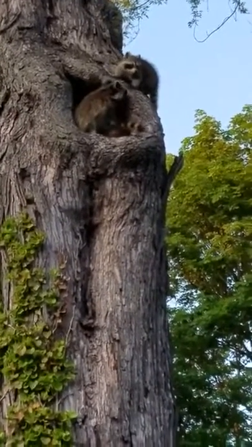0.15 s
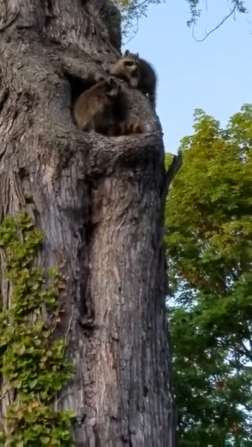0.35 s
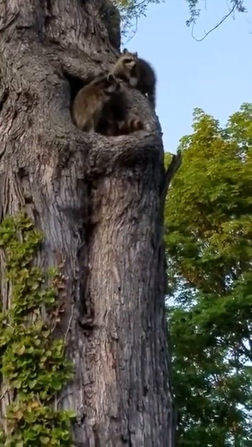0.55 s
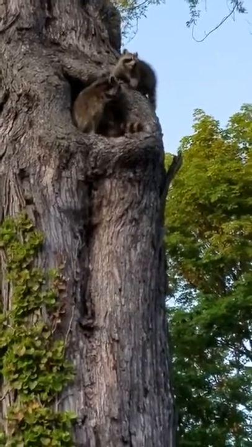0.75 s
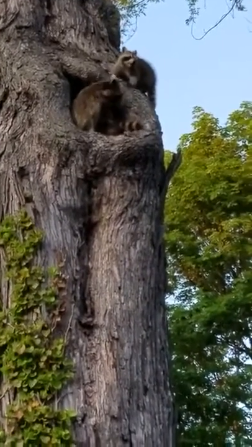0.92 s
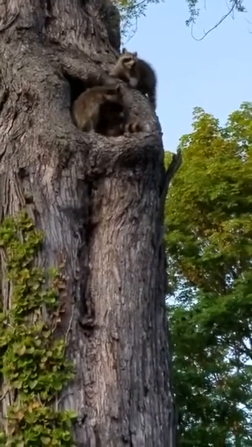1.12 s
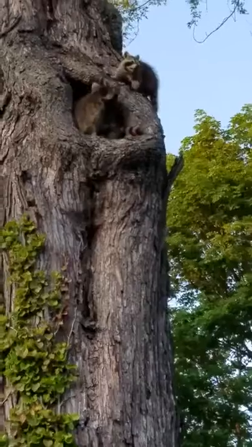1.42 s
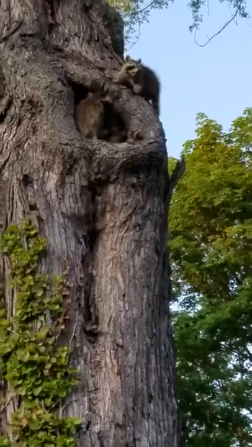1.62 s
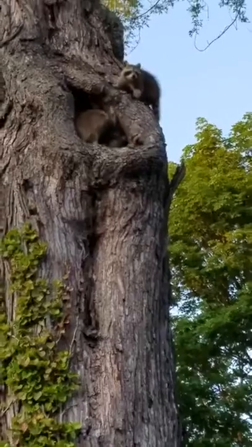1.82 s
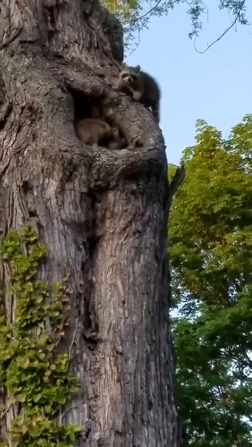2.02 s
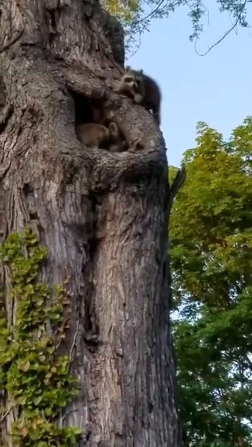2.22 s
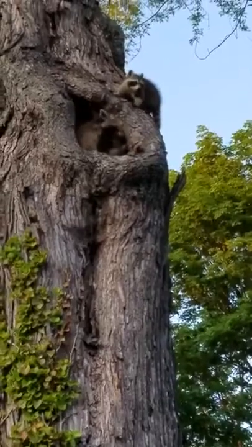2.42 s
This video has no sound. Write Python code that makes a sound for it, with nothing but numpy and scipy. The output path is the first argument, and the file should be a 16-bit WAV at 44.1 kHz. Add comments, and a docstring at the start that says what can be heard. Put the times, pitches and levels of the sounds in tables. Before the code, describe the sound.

Raspy raccoon chatter, rapid pulsing squeaks from two animals, then fading echo and faint outdoor rumble

```python
"""Two raccoons quarrel at a hollow in a tree, a few metres above the microphone.
One chitters in high, arched squeaks, about 21 a second; a lower, hoarser voice joins: both are summed partials.
A rasp of filtered noise surges with their squeaks, and moving resonances shape the mouths.
Delayed copies and decaying noise echo them from a wall and nearby surfaces.
Behind lie a faint noise rumble, a sine hum, swelling hiss, a few soft thumps and light ticks."""
import sys
import numpy as np
from scipy import signal
from scipy.fft import rfft, irfft
from scipy.io import wavfile

SR = 44100
rng = np.random.default_rng(int(sys.argv[2]) if len(sys.argv) > 2 else 0)


def put_to_file(sound):
    """Save the sound as 16-bit audio at rate SR, in the file named by the first command-line argument."""
    columns = np.atleast_2d(sound).T  # one column per channel
    safe = np.clip(columns, -1, 1)
    whole_steps = np.round(safe * 32767)
    wavfile.write(sys.argv[1], SR, whole_steps.astype(np.int16))


N = 112454

# Spectrum of the distant outdoor rumble: (frequency [Hz], relative level [dB])
OUTDOORS_SPECTRUM = [(25, -23), (40, -22), (59, -21), (107, -6), (130, -3), (200, -1.5), (280, -5),
                     (445, -11.5), (920, -10.5), (1500, -16.5), (2200, -24.5), (3800, -23), (6200, -39.5),
                     (15500, -47)]
# Stereo width of the rumble: (frequency [Hz], side against mid [dB])
OUTDOORS_WIDTH = [(60, -25), (125, -22.5), (250, -12.5), (500, -10), (1000, -5), (4000, -0.5)]
# Faint, distant hisses: (peak time [s], time from peak to an 11 dB fall [s], centre [Hz],
# level before colouring [dB])
DISTANT_HISSES = [(.11, .07, 3600, -57), (2.02, 0.12, 3600, -55.5), (2.32, .09, 3970, -57)]
# Dulling of the distant hiss: (frequency [Hz], gain [dB])
HISS_COLOUR = [(1500, -11), (4700, -1), (7000, -8)]
# Soft thumps: (time [s], length before the release [s], centre [Hz], peak level of the boom [dB])
SOFT_THUMPS = [(0.153, .052, 131.6, -39.5), (1.213, 0.043, 132, -43.5), (1.503, 0.016, 190, -45.5),
               (1.539, 0.038, 148.5, -50.5), (1.753, 0.056, 150, -47), (2.22, .014, 208, -47.5),
               (2.402, 0.028, 190, -51)]
# Light ticks, perhaps claws on bark: (time [s], centre [Hz], level before decay and colouring [dB])
LIGHT_TICKS = [(1.76, 350, -43), (1.774, 496, -39), (1.795, 434, -41), (1.796, 1700, -42.5),
               (2.02, 1670, -53)]
# Colour of the late echoes, body and treble: (frequency [Hz], gain [dB])
TAIL_COLOUR = [(1200, 5), (1650, -5), (2500, 4.0), (3100, -3.0), (6000, -8.0)]
TAIL_TREBLE_COLOUR = [(2000, -13.0), (4500, 1), (14000, -11.5)]
# Colour of the left microphone against the right: (frequency [Hz], gain [dB])
LEFT_MIC_COLOUR = [(1000, -2), (1600, -7.5), (2000, -6.5), (2800, 0), (4000, 0.5), (6000, -2.5), (9000, -4),
                   (14000, -1.5)]
# Forced air in both throats: (time [s], middle before trim [dB], treble before trim [dB])
RASP_LEVELS = [(0.17, -58, -62), (0.208, -54, -40.5), (0.228, -51, -51.5), (0.246, -47.5, -38.5),
               (0.469, -45.5, -40), (0.698, -32.5, -31), (0.914, -39.5, -28.5), (0.965, -30.5, -27),
               (1.014, -38.5, -33), (1.04, -32.5, -25), (1.24, -33, -29.5), (1.268, -28.5, -29),
               (1.386, -30.5, -24.5), (1.43, -32, -32)]
# Throat colour of the rasp, middle and treble: (frequency [Hz], relative level [dB])
RASP_MIDDLE_COLOUR = [(500, -54), (1100, -25.5), (1400, -0.5), (1650, -3), (2150, -1), (2550, 2),
                      (2800, -4), (3150, 2), (3550, -5.5), (3950, -7.5), (4450, -11.5), (5200, -35)]
RASP_TREBLE_COLOUR = [(3800, -35), (4500, -9), (4900, 3), (5400, 3), (5850, 1), (6700, 3), (7500, 0),
                      (8300, -3), (8900, -5.5), (11000, -3.5), (12300, -13.5), (13800, -11.5), (15500, -15)]
# Narrow fixed resonances in the rasp: (frequency [Hz], width [Hz], level [dB])
RASP_RESONANCES = [(5780, 260, -3), (6720, 240, -4)]
# Moving upper resonance of the mouths: (time [s], frequency [Hz])
MOUTH_PATH = [(.2, 3400), (.45, 3330), (.6, 3700), (.8, 3860), (1.0, 4200), (1.24, 4010), (1.32, 4310),
              (1.41, 4300)]
# Squeaks of each voice: (start [s], length before the release [s], pitch before the arch [Hz],
# fundamental before colouring [dB], octave before colouring [dB])
LOW_SQUEAKS = [(0.474, 0.04, 1580, -30, -34), (0.564, 0.034, 1558, -30, -36),
               (0.608, 0.024, 1575, -27, -30), (0.655, 0.035, 1624, -25.5, -26),
               (0.708, 0.024, 1598, -25.5, -29), (0.747, 0.043, 1580, -25, -30),
               (0.79, 0.049, 1587, -27, -23), (0.845, 0.038, 1616, -21, -20.5),
               (0.891, 0.033, 1640, -27.5, -21), (0.946, 0.039, 1622, -31, -34),
               (0.985, 0.033, 1608, -28, -27.5), (1.024, 0.048, 1650, -28, -23),
               (1.079, 0.0278, 1592, -30, -28.5), (1.126, 0.05, 1607, -27.5, -25.5),
               (1.16, 0.035, 1574, -27, -27), (1.208, 0.032, 1553, -29, -29.5),
               (1.266, 0.04, 1558, -27.5, -36), (1.349, 0.054, 1611, -24.5, -27)]
HIGH_SQUEAKS = [(0.189, 0.028, 1407, -34.5, -47.5), (0.235, 0.026, 1656, -22, -26),
                (0.282, 0.031, 1757, -23.5, -26), (0.338, 0.027, 1778, -23.5, -26),
                (0.389, 0.034, 1745, -26, -25.5), (0.438, 0.031, 1750, -28, -25),
                (0.482, 0.037, 1784, -25, -25.5), (0.531, 0.033, 1831, -25.5, -22.5),
                (0.573, 0.034, 1854, -30.5, -22), (0.618, 0.042, 1890, -30, -23.5),
                (0.669, 0.034, 1927, -28, -21), (0.713, 0.031, 1920, -28.5, -20),
                (0.761, 0.028, 1930, -32, -19), (0.808, 0.045, 1950, -28.5, -23),
                (0.869, 0.03, 1988, -24, -19.5), (0.914, 0.0328, 1995, -20.5, -20.5),
                (0.956, 0.032, 1996, -22.5, -22), (0.998, 0.028, 1980, -21, -17.5),
                (1.052, 0.032, 1963, -28, -28), (1.09, 0.03, 1960, -28, -21.5),
                (1.212, 0.031, 1942, -42, -23), (1.288, 0.038, 2068, -36, -24.5),
                (1.384, 0.022, 2097, -38, -31)]
# Partials from the third up: (level relative to the octave [dB])
LOW_UPPER_PARTIALS = [-14.5, -3, -13.5]
HIGH_UPPER_PARTIALS = [-13.5, -11]
# Depth of the pitch arch; the high one flattens: (time [s], relative fall per squared share of length)
LOW_PITCH_ARCH = [(0, .19)]
HIGH_PITCH_ARCH = [(.35, 0.219), (.75, 0.1104)]
# Throat resonances of each voice: (frequency [Hz], gain [dB])
LOW_THROAT_COLOUR = [(1100, -4), (1450, 0), (1610, 6.5), (1750, 6.5), (2600, 13), (2900, 7.5), (3070, 9),
                     (3250, -2.5), (4300, -7), (4900, 9.5), (6500, -1), (9000, 8.5)]
HIGH_THROAT_COLOUR = [(1100, -3.5), (1600, 5), (1800, -1), (2000, 1.5), (2500, 6.5), (3100, 1), (3300, -2),
                      (3520, 1.5), (3700, 0), (3950, -0.5), (4200, -5), (4500, -20), (5000, 0.5),
                      (5400, 1.5), (5850, 3), (6600, 1), (7300, 2.5), (7700, -19), (8000, -2), (8700, 4.5)]
# Hiss that rides on each squeak: (frequency [Hz], relative level [dB])
FIZZ_COLOUR = [(1500, -10), (2300, 21.5), (2800, -19), (3080, 7), (3700, -6), (4200, -17), (4800, 5),
               (7000, -3), (8000, -2), (11000, 5), (12000, -1), (14000, 5.5)]

# Background; the rumble and hum levels precede their drift and the left/right balance
OUTDOORS_DB, HUM_DB, HUM_HZ = -47.89, -61, 71.4
THUMP_SAG_PER_S, SCUFF_DB = 5, -6.5  # relative fall in pitch; scuffing noise against the boom

# Echoes around the tree
DIRECT_LEFT_DB, DIRECT_RIGHT_DB = -7, -3.5
WALL_DELAY_S, WALL_LEFT_DB, WALL_RIGHT_DB = 0.017, -7, -14.5
NEAR_DB, TAIL_DB, TAIL_T60_S, TAIL_TREBLE_T60_S = -4.5, -11, 0.7, 0.41
SHIMMER_S, SHIMMER_HZ = .00016, 25  # rms waver of the late echoes' path, as delay; its rate limit
# Direct sound on the left is cancelled and inverted near the fundamental
LEFT_DIP, LEFT_DIP_HZ, LEFT_DIP_WIDTH_HZ = 1.3, 1520, 330

# Rasp and mouths
MIDDLE_TRIM_DB, TREBLE_TRIM_DB = 4, -4
RASP_END_S, RASP_RELEASE_S = 1.432, 0.089  # middle of the fade; its length
RASP_REST = 0.87  # share of the rasp that does not follow the squeaks
MOUTH_WIDTH_HZ, MOUTH_DB = 700, 1
NOTCH_RATIO, NOTCH_WIDTH_HZ, NOTCH_SHARE = 1.18, 560, .85  # frequency against the mouth; depth

# Squeaks
ATTACK_S, RELEASE_S = 0.005, 0.02
SWELL_PEAK, SWELL_DB = .66, 27.5  # loudest place (share of length); fall per squared share
ARCH_TOP = .86  # place of the highest pitch (share of length)
BRIGHTEN = 0.39  # each higher partial follows the push with this much more power
GRAIN, GRAIN_HZ = .14, 260  # unsteadiness of each partial's level; its rate limit
CREST_CALM = .66  # share of the pitch jitter removed at full push
FIZZ_DB = -21.5  # against the octave

TOP_HZ = 15550


def undb(db):
    """Decibels to gain."""
    return 10 ** (np.asarray(db) / 20)


def unit(x):
    """Scale to rms 1."""
    return x / np.sqrt(np.mean(x ** 2))


def curve(at, points):
    """Straight lines through (place, value) points."""
    return np.interp(at, *np.array(points, float).T)


def colour(x, points):
    """Filter by (frequency [Hz], gain [dB]) points on a logarithmic frequency scale."""
    hz, db = np.array(points, float).T
    f = np.maximum(np.arange(N // 2 + 1) * SR / N, 1)
    gain = undb(np.interp(np.log(f), np.log(hz), db))
    return irfft(rfft(x) * gain, N)


def coloured_noise(points):
    """Noise with a given spectrum, rms 1."""
    return unit(colour(rng.standard_normal(N), points))


def band(hz, width_hz):
    """Noise in one resonance, rms 1."""
    resonance = signal.iirpeak(hz, hz / width_hz, fs=SR)
    return unit(signal.lfilter(*resonance, rng.standard_normal(N)))


def wobble(rate_hz):
    """Random motion up to a rate, rms 1."""
    lowpass = signal.butter(2, rate_hz, fs=SR, output="sos")
    return unit(signal.sosfilt(lowpass, rng.standard_normal(N)))


def ring(x, hz, width_hz):
    """Band-pass with gain 1 at a centre that may move: shift to zero, smooth, shift back."""
    turn = np.exp(2j * np.pi * np.cumsum(hz * np.ones(N)) / SR)
    pole = np.exp(-np.pi * width_hz / SR)
    return 2 * np.real(turn * signal.lfilter([1 - pole], [1, -pole], x / turn))


def gate(age, length):
    """Attack, hold and release of one short sound."""
    attack = np.clip(age / ATTACK_S, 0, 1)
    release = np.clip((length - age) / RELEASE_S + .5, 0, 1)
    return attack * release


def distant_hiss(t):
    """Faint resonant noise that swells and fades, for one channel."""
    hiss = np.zeros(N)
    for peak, spread, hz, db in DISTANT_HISSES:
        hiss += undb(db - 11 * ((t - peak) / spread) ** 2) * band(hz, 700)
    return colour(hiss, HISS_COLOUR)


def outdoors(t):
    """Distant noise rumble, wider towards the treble, with an unsteady sine hum and swelling hiss."""
    mid = coloured_noise(OUTDOORS_SPECTRUM)
    side = colour(coloured_noise(OUTDOORS_SPECTRUM), OUTDOORS_WIDTH)
    rumble = np.array([mid + side, mid - side]) * undb(OUTDOORS_DB + 0.37 * wobble(0.43))
    hum_pitch = HUM_HZ * (1 + 0.017 * wobble(3.9))
    hum_level = undb(HUM_DB + 2.6 * wobble(2.8))
    hum = hum_level * np.sqrt(2) * np.sin(2 * np.pi * np.cumsum(hum_pitch) / SR)
    balance = undb([[-1], [.9]])  # left, right
    return (rumble + hum) * balance + np.array([distant_hiss(t), distant_hiss(t)])


def thumps(t):
    """Dull booms that sag in pitch, mixed with scuffing noise under a half-sine envelope."""
    out = np.zeros(N)
    for start, length, hz, db in SOFT_THUMPS:
        along = np.clip((t - start) / (length + RELEASE_S), 0, 1)
        pitch = hz * np.exp(-THUMP_SAG_PER_S * (along - .5) * length)
        boom = np.sqrt(2) * np.sin(2 * np.pi * (np.cumsum(pitch) / SR + rng.random()))
        scuff = unit(colour(band(hz, 195), [(hz / 3, -20), (hz, 0), (hz * 10, -12)]))
        out += undb(db) * np.sin(np.pi * along) * (boom + undb(SCUFF_DB) * scuff)
    return out


def ticks(t):
    """Light knocks: resonant noise that starts at once and decays within milliseconds."""
    out = np.zeros(N)
    for start, hz, db in LIGHT_TICKS:
        decay = (t > start) * np.exp(-np.abs(t - start) / 0.0062)
        out += undb(db) * colour(band(hz, 260) * decay, [(hz, 0), (hz * 4, -8), (hz * 10, -20)])
    return out


def scatter(t, delay, t60):
    """Dense echoes as a noise response of unit energy, falling 60 dB in t60 seconds."""
    decay = (t > delay) * np.exp(-np.log(1000) * t / t60)
    return unit(rng.standard_normal(N) * decay) / np.sqrt(N)


def echo(t, x, response):
    """Convolve with the first second of an echo response."""
    return signal.fftconvolve(x, response[t < 1])[:N]


def yard_channel(t, x, direct, direct_db, wall_gain):
    """Direct sound, one wall echo, scatter from nearby surfaces and a diffuse, shimmering tail."""
    wall = wall_gain * np.interp(t - WALL_DELAY_S, t, x)
    near = undb(NEAR_DB) * echo(t, x, scatter(t, .005, 0.07))
    body = colour(scatter(t, 0.03, TAIL_T60_S), TAIL_COLOUR)
    treble = colour(scatter(t, .025, TAIL_TREBLE_T60_S), TAIL_TREBLE_COLOUR)
    tail = echo(t, x, body + treble)
    tail = np.interp(t + SHIMMER_S * wobble(SHIMMER_HZ), t, tail)
    return undb(direct_db) * direct + wall + near + undb(TAIL_DB) * tail


def yard(t, x):
    """Two channels of the yard: on the left the wall echo is inverted and the direct sound has a dip."""
    dipped = x - LEFT_DIP * ring(x, LEFT_DIP_HZ, LEFT_DIP_WIDTH_HZ)
    left = yard_channel(t, x, dipped, DIRECT_LEFT_DB, -undb(WALL_LEFT_DB))
    right = yard_channel(t, x, x, DIRECT_RIGHT_DB, undb(WALL_RIGHT_DB))
    return np.array([colour(left, LEFT_MIC_COLOUR), right])


def rasp(t, flow):
    """Turbulent air in the throats: it surges with each squeak, rattles irregularly and dies away."""
    times, middle_db, treble_db = np.array(RASP_LEVELS).T
    surge = RASP_REST + (1 - RASP_REST) * np.minimum(flow, 1)
    ending = np.clip((RASP_END_S - t) / RASP_RELEASE_S + .5, 0, 1)
    rattle = unit(np.exp(0.13 * band(190, 360)))
    middle = coloured_noise(RASP_MIDDLE_COLOUR) * undb(np.interp(t, times, middle_db + MIDDLE_TRIM_DB))
    treble = coloured_noise(RASP_TREBLE_COLOUR) * undb(np.interp(t, times, treble_db + TREBLE_TRIM_DB))
    return surge * (t > times[0]) * ending * rattle * (middle + treble)


def mouth(t, voices, air):
    """The rasp rings the mouths' resonances; an antiresonance above the moving one hollows the call."""
    hz = curve(t, MOUTH_PATH)
    x = voices + air + undb(MOUTH_DB) * ring(air, hz, MOUTH_WIDTH_HZ)
    for ring_hz, width_hz, db in RASP_RESONANCES:
        x = x + undb(db) * ring(air, ring_hz, width_hz)
    for _ in range(2):  # two passes deepen the notch
        x = x - NOTCH_SHARE * ring(x, NOTCH_RATIO * hz, NOTCH_WIDTH_HZ / 2)
    return x


def voice(t, notes, overtones, jitter, jitter_hz, flutter, flutter_hz, arch):
    """Squeaks of harmonics that swell, brighten and arch in pitch, with flutter; also their air flow."""
    out, flow = np.zeros(N), np.zeros(N)
    unsteady = jitter * wobble(jitter_hz)
    fizz = coloured_noise(FIZZ_COLOUR)
    beating = unit(ring(wobble(2 * flutter_hz), flutter_hz, flutter_hz))
    rough = unit(1 + flutter * np.tanh(beating))
    grain = [unit(1 + GRAIN * wobble(GRAIN_HZ)) for _ in range(len(overtones) + 2)]
    for start, length, hz, first_db, octave_db in notes:
        on = (t >= start) & (t < start + length + RELEASE_S)
        age = t[on] - start
        along = age / length
        envelope = gate(age, length)
        push = envelope * undb(-SWELL_DB * (along - SWELL_PEAK) ** 2)
        arched = 1 + curve(start, arch) * (.07 - (along - ARCH_TOP) ** 2)
        shaken = 1 + unsteady[on] * (1 - CREST_CALM * push)  # cycles steady at the crest
        phase = 2 * np.pi * (np.cumsum(hz * arched * shaken) / SR + rng.random())
        gains = undb([first_db, octave_db] + [octave_db + db for db in overtones])
        for k, gain in enumerate(gains):
            level = np.sqrt(2) * gain * push ** (1 + BRIGHTEN * k) * grain[k][on]
            out[on] += level * np.sin((k + 1) * phase)
        out[on] += envelope * undb(octave_db + FIZZ_DB) * fizz[on]
        flow[on] += push
    return out * rough, flow


def scene():
    """Both animals in the tree, heard across the yard over the outdoor background."""
    t = np.arange(N) / SR
    low, low_flow = voice(t, LOW_SQUEAKS, LOW_UPPER_PARTIALS, jitter=.031, jitter_hz=565,
                          flutter=.36, flutter_hz=144, arch=LOW_PITCH_ARCH)
    high, high_flow = voice(t, HIGH_SQUEAKS, HIGH_UPPER_PARTIALS, jitter=.027, jitter_hz=616,
                            flutter=.42, flutter_hz=133, arch=HIGH_PITCH_ARCH)
    low = undb(-2.0) * colour(low, LOW_THROAT_COLOUR)
    high = undb(1.05) * colour(high, HIGH_THROAT_COLOUR)
    quarrel = mouth(t, low + high, rasp(t, low_flow + high_flow))
    return outdoors(t) + thumps(t) + ticks(t) + yard(t, quarrel)


def record(dry):
    """The recorder cuts the top with a steep low-pass, run both ways to keep the timing."""
    lowpass = signal.ellip(8, .1, 60, TOP_HZ, fs=SR, output="sos")
    return signal.sosfiltfilt(lowpass, dry)


dry = scene()
out = record(dry)
put_to_file(out)
```